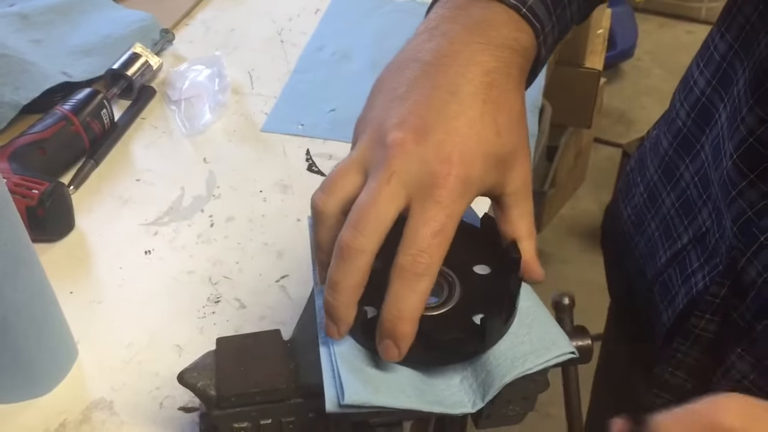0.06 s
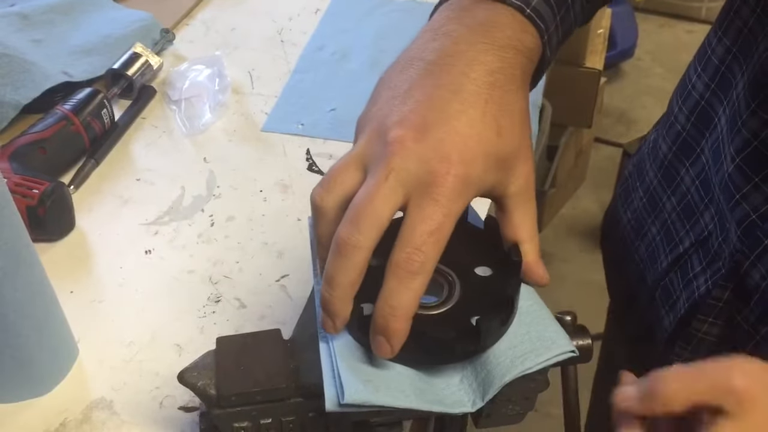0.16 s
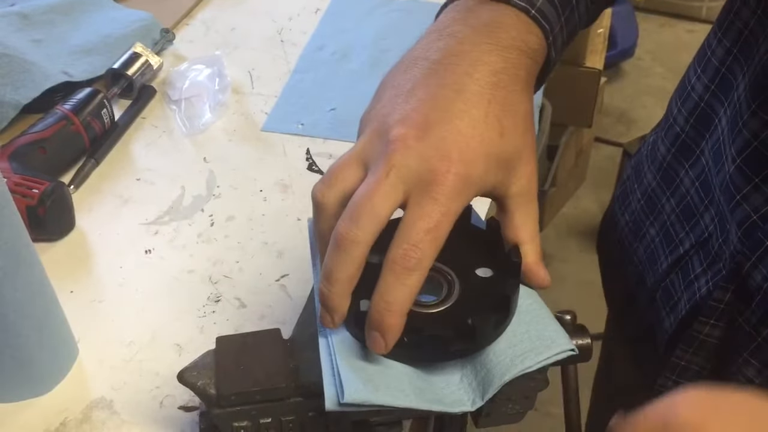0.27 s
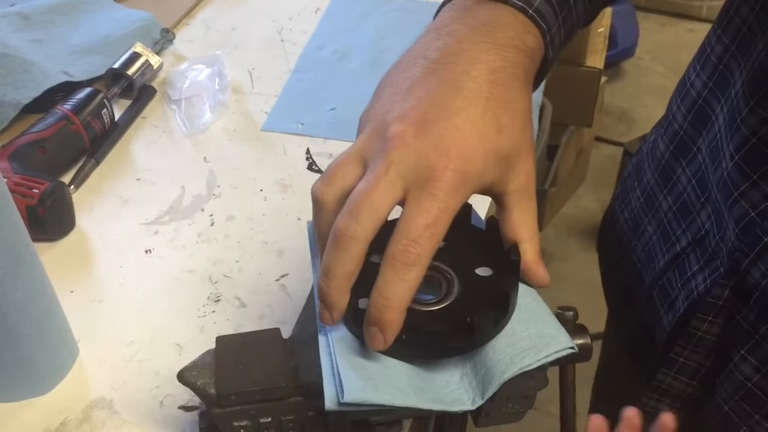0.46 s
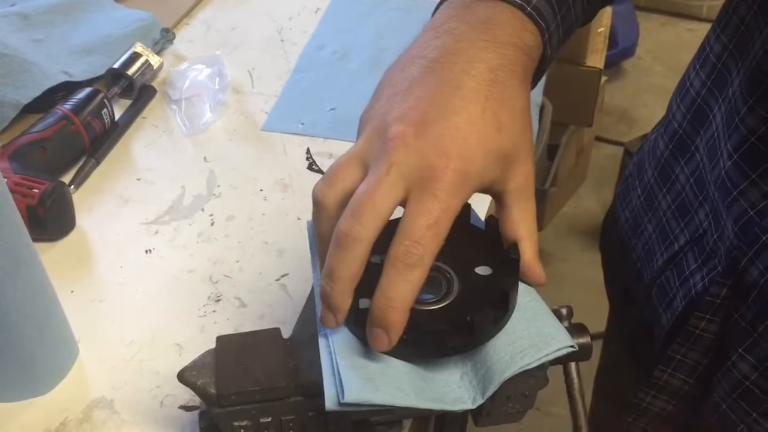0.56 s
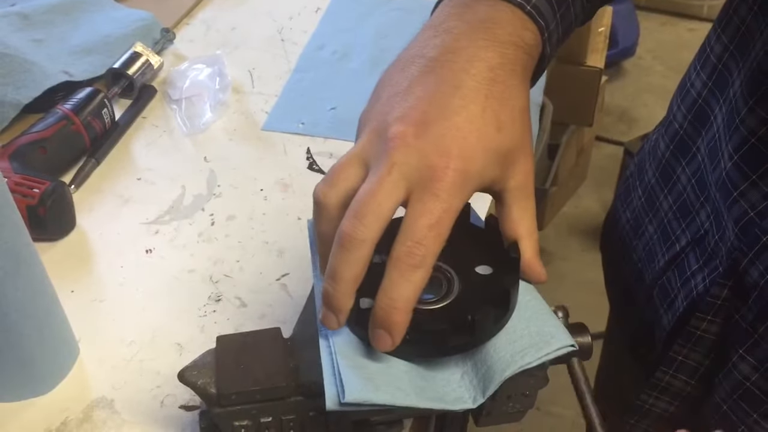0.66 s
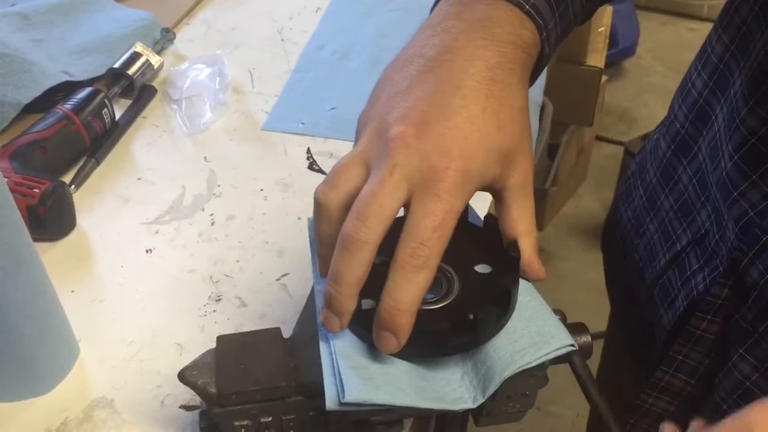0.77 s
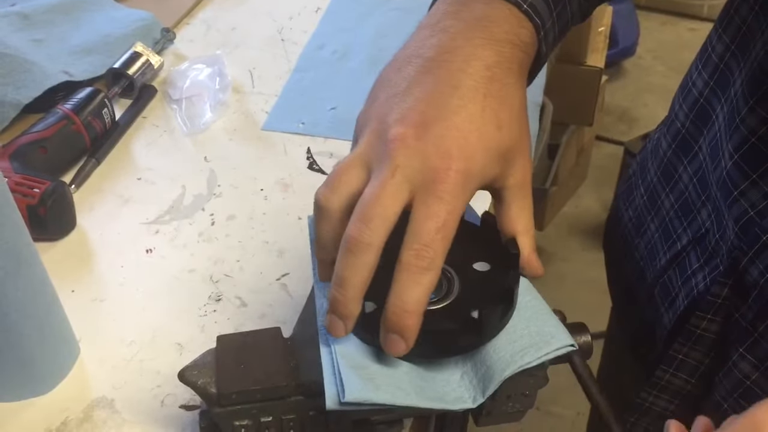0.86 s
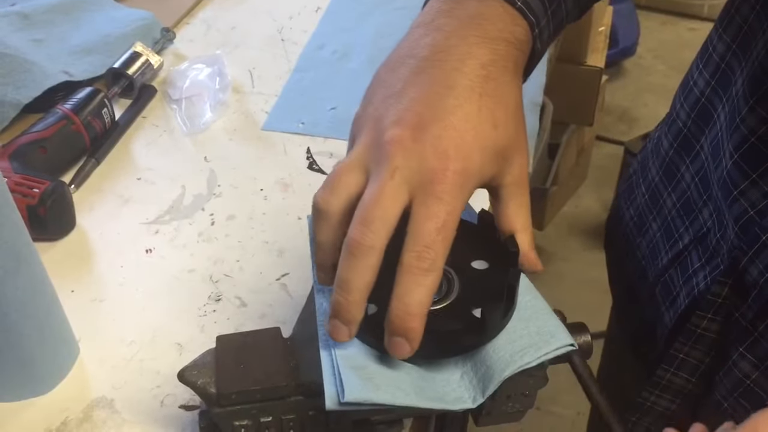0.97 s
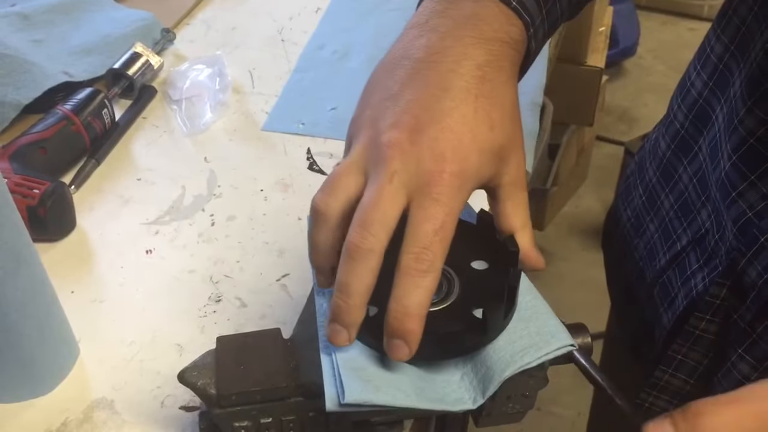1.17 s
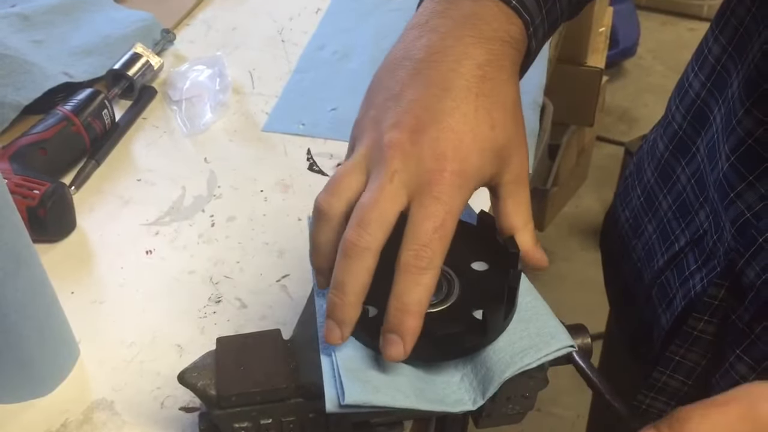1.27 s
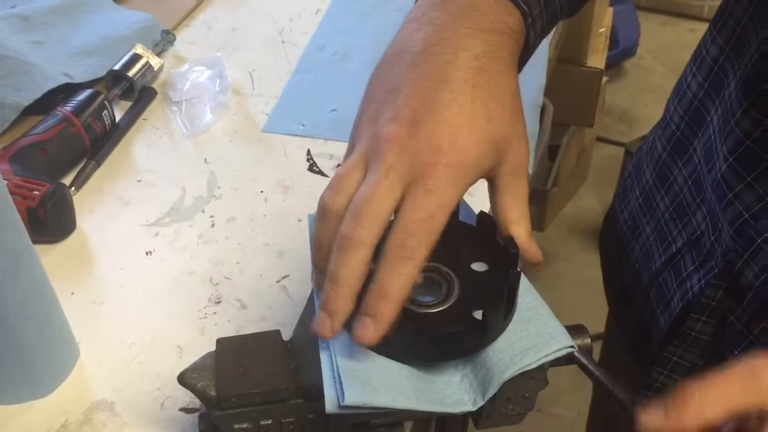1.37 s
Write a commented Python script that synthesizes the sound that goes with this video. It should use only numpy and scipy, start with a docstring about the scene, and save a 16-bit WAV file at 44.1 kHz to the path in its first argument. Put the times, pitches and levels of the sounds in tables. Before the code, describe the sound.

A bench vise is tightened by its loose steel handle. Soft low thumps and rustling open; at 0.2 s a light clack starts a short gritty scrape with shrill chatter, ending in a sharp, loud clack at 0.3 s. Dull thumps follow, then a ringing clack with a solid knock at 0.6 s. A small tick near 1 s, a faint skin scuff and low thumps fade into quiet workshop air.

```python
"""Soft thumps and a low rustle of handling open in a quiet workshop, where a bench vise is being tightened.
Its loose steel handle scrapes through the spindle head, chatters and clacks against its end knob, then is
swung over and clacks again. Each blow is a noise crack plus struck modes of steel and bench, spread treble first.
Scrape and chatter are shaped noise with rough partials; ticks are bands of noise and thumps are dying sines.
Thumps run on through the scene among the light ticks, and a soft scuff of skin comes late."""
import sys
import numpy as np
from scipy import signal
from scipy.fft import rfft, irfft, next_fast_len
from scipy.io import wavfile
from scipy.ndimage import map_coordinates

SR = 44100
rng = np.random.default_rng(int(sys.argv[2]) if len(sys.argv) > 2 else 0)


def store_pcm(level_fs):
    """Save levels as 16-bit WAV."""
    pcm = np.round(np.clip(level_fs, -1, 1) * 32767).astype(np.int16)
    wavfile.write(sys.argv[1], SR, np.atleast_2d(pcm).T)


N = 61739  # length of the scene in samples
T = np.arange(SR // 3) / SR  # time within one event [s]
SCENE_T = np.arange(N) / SR  # time within the scene [s]


def amp(db):
    """Decibels to linear gain."""
    return 10 ** (np.asarray(db) / 20)


def unit(x):
    """Scale to an rms of 1."""
    return x / np.sqrt(np.mean(x ** 2) + 1e-20)


def along(points, hz):
    """Read (frequency, value) points on a log frequency axis."""
    f, v = np.transpose(points)
    return np.interp(np.log(hz + 1), np.log(f + 1), v)


def curve(rows):
    """One value per sample from (time, value) rows."""
    return np.interp(SCENE_T, *np.transpose(rows))


def wobble(rate, size=len(T)):
    """A random curve of straight segments, rate knots a second."""
    knots = rng.standard_normal(size // 8)
    return map_coordinates(knots, [np.arange(size) * rate / SR], order=1)


def filtered(x, response):
    """Multiply the spectrum of x by a complex response of frequency."""
    m = next_fast_len(len(x) + SR // 20, True)
    hz = np.fft.rfftfreq(m, 1 / SR)
    return irfft(rfft(x, m) * response(hz), m)[:len(x)]


def noise(shape_db, size=len(T)):
    """Noise of rms 1 coloured by a function of frequency."""
    white = rng.standard_normal(size)
    return unit(filtered(white, lambda hz: amp(shape_db(hz))))


def strike(t60, attack=0.00033):
    """Envelope of a struck body: a quick rise and an exponential fall."""
    return (1 - np.exp(-T / attack)) * np.exp(-np.log(1000) * T / t60)


def add(out, s, x):
    """Mix x into out from time s."""
    part = out[max(round(s * SR), 0):][:len(x)]
    part += x[:len(part)]


# colour of the still air: (frequency [Hz], level [dB])
AIR_COLOUR = [(22, -31.5), (42, -6.5), (62, -6), (92, 3), (120, -15.5), (180, -10), (260, -13),
              (430, -22.5), (600, -23.5), (1500, -26.5), (5000, -32), (16000, -40)]
AIR_DB = -66


def still_air():
    """The quiet room's steady, bass-heavy noise floor."""
    return amp(AIR_DB) * noise(lambda hz: along(AIR_COLOUR, hz), size=N)


# decay of the room by frequency: (frequency [Hz], t60 [s])
ROOM_DECAY = [(150, 0.19), (600, 0.3), (2000, 0.24), (6000, 0.2), (14000, 0.12)]
ROOM_GAP_S = 0.0049  # time scale of the tail's fade-in


def workshop(x):
    """The room's short answer: a noise tail whose t60 depends on frequency, shortest in the top treble."""
    hz, t, z = signal.stft(rng.standard_normal(SR // 2), SR, nperseg=256)
    decay = amp(-60 * t / along(ROOM_DECAY, hz)[:, None])
    tail = signal.istft(z * decay, SR, nperseg=256)[1]
    tail = tail * (1 - np.exp(-(np.arange(len(tail)) / SR / ROOM_GAP_S) ** 2))
    return signal.fftconvolve(x, tail / np.linalg.norm(tail))[:N]


# swell of the low rustle: (time [s], level [dB])
RUSTLE_LEVEL = [(0, -53), (.06, -55.5), (.12, -60), (.17, -76), (.5, -72), (.8, -64.5), (.95, -79),
                (1.4, -79)]
# colour of the rustle: (frequency [Hz], level [dB])
RUSTLE_COLOUR = [(25, -26), (45, -4), (160, -3.5), (240, -4.5), (380, -12), (550, -16.5), (900, -27.5),
                 (2300, -32), (6000, -48.5), (12000, -62.5)]
# dull thumps of vise and bench: (time [s], level [dB], pitch [Hz], t60 [s])
THUMPS = [(.002, -49.5, 83, 0.41), (.04, -48, 164, 0.17), (.078, -51.5, 136.7, 0.18),
          (0.136, -52.5, 71, 0.16), (0.173, -49, 274, 0.11), (.281, -42, 330, 0.088),
          (.308, -32, 254.3, 0.12), (.355, -41.5, 188.3, 0.21), (0.361, -49, 96.2, 0.23),
          (0.411, -45, 271.6, 0.069), (0.431, -48, 91, 0.18), (.49, -48.5, 98, 0.16),
          (.617, -27, 512.4, 0.056), (0.621, -38.5, 346, .07), (0.664, -46.5, 196.4, 0.22),
          (.74, -54, 87, 0.14), (1.033, -59.5, 528, .1), (1.054, -47, 139, 0.087), (1.077, -47.5, 150, .1),
          (1.146, -52.5, 86.4, 0.14), (1.247, -58.5, 91.2, 0.32)]
THUMP_ATTACK_S = 0.0048


def handling():
    """Dull thumps of vise and bench as dying sines, and the low rustle of the part shifting on its cloth."""
    out = amp(curve(RUSTLE_LEVEL)) * noise(lambda hz: along(RUSTLE_COLOUR, hz), size=N)
    for s, db, hz, t60 in THUMPS:
        sine = np.sqrt(2) * np.sin(2 * np.pi * hz * T)
        add(out, s, amp(db) * strike(t60, THUMP_ATTACK_S) * sine)
    return out


# colour of skin on the handle: (frequency [Hz], level [dB])
SCUFF_COLOUR = [(100, -17), (270, 11.5), (550, -1.5), (900, -8.5), (1500, -9.5), (3000, -14),
                (10000, -32.5)]
SCUFF_S, SCUFF_WIDTH_S, SCUFF_DB = 1.045, .014, -64  # centre and spread of the swell, level


def scuff():
    """The hand takes a new grip: skin brushes the handle in one smooth swell of noise."""
    swell = np.exp(-.5 * ((SCENE_T - SCUFF_S) / SCUFF_WIDTH_S) ** 2)
    return amp(SCUFF_DB) * swell * noise(lambda hz: along(SCUFF_COLOUR, hz), size=N)


# light ticks: (time [s], level [dB], centre [Hz], half width at -6 dB [octaves], t60 [s])
LIGHT_TICKS = [(0.222, -47, 11700, .15, 0.02), (0.2775, -41.5, 2600, 0.98, .02),
               (.2895, -51, 8056, 1.2, 0.0046), (0.418, -54.5, 1400, 0.35, 0.011),
               (0.5643, -53, 7850, .7, 0.0058), (0.599, -40, 7020, 1.2, 0.0033),
               (0.6088, -36.5, 6670, .1, 0.014), (0.6091, -40.5, 11670, .15, 0.01),
               (0.765, -53.5, 1334, 0.052, 0.039), (0.9861, -45.5, 1730, 0.36, 0.0052),
               (0.9847, -55, 3400, 0.77, 0.011), (0.9854, -58, 14000, 0.27, 0.0058)]


def ticks():
    """Small slips of the handle, screw and jaws: short bands of noise."""
    out = np.zeros(N)
    for s, db, hz, width, t60 in LIGHT_TICKS:
        band = noise(lambda f: -20 * np.log10(1 + (np.log2((f + 1) / hz) / width) ** 4))
        add(out, s, amp(db) * strike(t60) * band)
    return out


# swell of the slide: (time [s], scrape level [dB])
SLIDE_LEVEL = [(.14, -120), (.175, -67), (.203, -59), (.213, -42.5), (.235, -45), (.256, -49.5),
               (.274, -43.5), (.281, -42.5), (.3, -33), (.312, -61), (.34, -120)]
# colour of the scrape: (frequency [Hz], level [dB])
SCRAPE_COLOUR = [(71, -44.5), (120, -11), (191, -1.5), (357, 0), (524, -20.5), (739, -8), (961, -18),
                 (1500, -6), (1630, -17), (3170, -14), (8350, -42.5), (11300, -29.5), (15000, -58)]
ROD_HZ, ROD_UPPER_HZ = 5660, 11000  # the rod's two partials, heard in slide and chatter
SQUEAL_DB, UPPER_SQUEAL_DB = -17, -20.5  # relative to the scrape
SQUEAL_ROUGH, SQUEAL_WAVER_DB = .55, 3.5  # phase wobble [rad] and level wobble, per unit of random curve
GRAIN_DB = 2.5  # unevenness of the scrape, per unit of random curve


def slide():
    """The rod scrapes through the spindle head in uneven grains, with a faint wavering squeal."""
    grains = amp(GRAIN_DB * wobble(500, size=N))
    scrape = unit(noise(lambda hz: along(SCRAPE_COLOUR, hz), size=N) * grains)

    def squeal(hz):
        """One rod partial with a rough phase and a wavering level."""
        phase = 2 * np.pi * hz * SCENE_T + SQUEAL_ROUGH * wobble(400, size=N)
        return unit(np.sin(phase) * amp(SQUEAL_WAVER_DB * wobble(140, size=N)))

    lower = amp(SQUEAL_DB) * squeal(ROD_HZ)
    upper = amp(UPPER_SQUEAL_DB) * squeal(ROD_UPPER_HZ)
    return amp(curve(SLIDE_LEVEL)) * (scrape + lower + upper)


# chatter of the rod in its hole; the last two levels are relative to the lower partial:
# (time [s], length [s], level [dB], upper partial [dB], rasp [dB])
CHATTER_BURSTS = [(0.2067, 0.0065, -48, -19, -9.5), (.215, .006, -42.5, -8.5, 0.5),
                  (0.285, 0.009, -52, -7.5, -20.5), (0.295, 0.0086, -41, -18.5, 0),
                  (0.3024, 0.0012, -23.5, -34, -3), (.304, 0.0048, -41, 6.5, -7),
                  (0.5988, 0.0122, -42.5, -1.5, -0.5)]
# colour of the rasp: (frequency [Hz], level [dB])
RASP_COLOUR = [(1400, -10), (2000, 0), (2700, -2), (6200, -3.5), (8200, -22.5), (11500, -15.5),
               (13000, -26.5), (14500, -21), (16000, -36.5)]
CHATTER_ROUGH = .45  # phase wobble [rad] per unit of random curve
CHATTER_RELEASE_S = 0.00071  # time constant of the fall after each burst


def chatter():
    """The rod judders in its hole: short, shrill bursts of two rough partials and a rasp of noise."""
    def tone(hz):
        """One rod partial with a rough phase."""
        return np.sqrt(2) * np.sin(2 * np.pi * hz * T + CHATTER_ROUGH * wobble(700))

    out = np.zeros(N)
    for s, length, db, upper_db, rasp_db in CHATTER_BURSTS:
        rasp = amp(rasp_db) * noise(lambda hz: along(RASP_COLOUR, hz))
        release = np.exp(-np.maximum(T - length, 0) / CHATTER_RELEASE_S)
        gate = (1 - np.exp(-T / 0.00035)) * release
        partials = tone(ROD_HZ) + amp(upper_db) * tone(ROD_UPPER_HZ)
        add(out, s, amp(db) * gate * (partials + rasp))
    return out


def ring(modes, sideways, attack, spread_db):
    """Struck modes: the direction of the blow sets their balance, with a little chance."""
    out = np.zeros(len(T))
    for hz, t60, end_db, side_db in modes:
        aimed_db = end_db + np.clip(sideways, 0, 1) * (side_db - end_db)
        level = amp(aimed_db + spread_db * rng.normal())
        out += level * strike(t60, attack) * np.sin(2 * np.pi * hz * T)
    return out


LAG_S, LAG_POWER = .0052, .78  # travel time at 1 kHz, growth towards the bass


def disperse(x):
    """Bending waves in the iron: below 120 Hz the lag is level, above it the treble runs ahead."""
    def response(hz):
        lag = LAG_S * (np.maximum(hz, 120) / 1000) ** -LAG_POWER
        delay = lag - along(np.c_[hz, lag], np.array(6000))  # 6 kHz arrives on time
        return np.exp(-2j * np.pi * np.cumsum(delay) * hz[1])  # phase is delay summed over frequency
    return filtered(x, response)


# handle blows; snap, steel and bench are relative to the crack, the five tints colour the crack:
# (time [s], level [dB], rattle t60 [s], snap [dB], tint at 250 Hz [dB], at 600 Hz [dB], at 3.5 kHz [dB],
#  at 11 kHz [dB], at 15 kHz [dB], steel ring [dB], bench ring [dB], direction [0 end-on to 1 sideways])
HANDLE_BLOWS = [(0.2206, -36, 0.055, -0.5, 14.5, 9.5, 17.5, -11, -16, -12, -3, 0),
                (.3016, -27, 0.045, 8.5, -1, 0, -3.5, 4, -4.5, -4, -7, 0.29),
                (0.6095, -31.5, 0.069, -3, -1, 1, -10.5, -11, -18, -5, -2.5, 1)]
# colour shared by the cracks: (frequency [Hz], level [dB])
CRACK_COLOUR = [(50, -20.5), (130, -5), (250, 4.5), (600, 3.5), (900, 1), (1300, -3), (2200, 3.5),
                (3500, 2.5), (4600, -7.5), (5700, 1), (6700, -6.5), (8200, -23.5), (10000, -7.5),
                (11400, -16), (13300, -18), (15500, -18)]
# modes of the handle: (frequency [Hz], t60 [s], level struck end-on [dB], level struck sideways [dB])
STEEL_MODES = [(1305, 0.1, -22.5, -15), (1483, .14, -27, -33.5), (1800, 0.2, -22, -19.5),
               (2736, 0.13, -22.5, -30.5), (3063, 0.13, -25, -27.5), (3226, 0.13, -24, -30),
               (3390, 0.18, -32, -28.5), (3580, .13, -23.5, -29.5), (5570, 0.17, -14, -25),
               (5765, 0.14, -19, -22), (6300, 0.15, -26, -17), (10045, 0.13, -35, -24.5),
               (11770, 0.1093, -16, -17.5), (14500, .08, -32, -26)]
# modes of vise and bench: (frequency [Hz], t60 [s], level struck end-on [dB], level struck sideways [dB])
BENCH_MODES = [(186.1, .28, -11, -18), (256.1, 0.24, -4, -3), (301, .15, -8.5, -16), (334.9, .18, 0, -3.5),
               (377, .15, -8.5, -11.5), (457.4, 0.25, -22.5, -15), (517, .1, -12, -5.5),
               (699, 0.19, -12, -11), (740.3, 0.25, -18, -11), (962.6, 0.18, -17, -11.5)]
SNAP_T60_S = 0.0069


def blows():
    """The handle hits its stop: a crack, ringing steel and the duller ring of vise and bench."""
    out = np.zeros(N)
    for (s, db, t60, snap_db, low_db, mid_db, high_db, top_db, fizz_db,
         steel_db, bench_db, sideways) in HANDLE_BLOWS:
        tint = [(250, low_db), (600, mid_db), (1700, 0), (3500, high_db),
                (6500, 0), (11000, top_db), (15000, fizz_db)]  # (frequency [Hz], level [dB])
        grit = noise(lambda hz: along(CRACK_COLOUR, hz) + along(tint, hz))
        crack = grit * (strike(t60) + amp(snap_db) * strike(SNAP_T60_S))
        steel = amp(steel_db) * ring(STEEL_MODES, sideways, attack=0.00055, spread_db=1.0)
        bench = amp(bench_db) * ring(BENCH_MODES, sideways, attack=0.0025, spread_db=2.0)
        add(out, s, amp(db) * (crack + steel + bench))
    return disperse(out)


ROOM_DB, CHATTER_ROOM_DB = -9.5, -15  # sends into the room


def scene():
    """Handle and ticks sound in the workshop, over the handling and still air."""
    steel = blows() + slide() + ticks()
    shrill = chatter()
    room = workshop(amp(ROOM_DB) * steel + amp(CHATTER_ROOM_DB) * shrill)
    return (steel + shrill + room + handling() + scuff() + still_air())[None]


LOW_CUT_HZ, TOP_HZ = 38, 15900


def record(dry):
    """The microphone sheds the deepest bass and keeps nothing above the band limit."""
    def response(hz):
        low_cut = hz ** 4 / np.sqrt(hz ** 8 + LOW_CUT_HZ ** 8)
        return (hz < TOP_HZ) * low_cut
    return filtered(dry[0], response)[None]


dry = scene()
out = record(dry)
store_pcm(out)
```